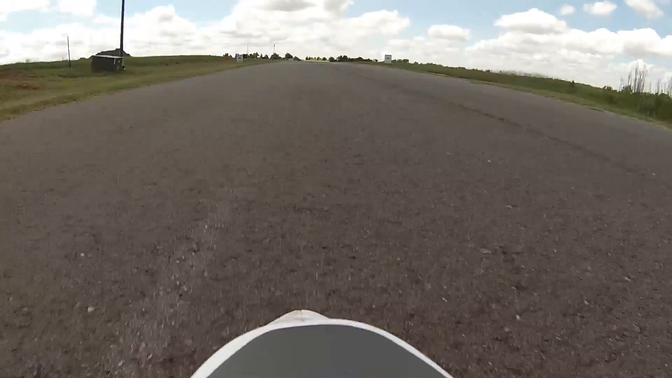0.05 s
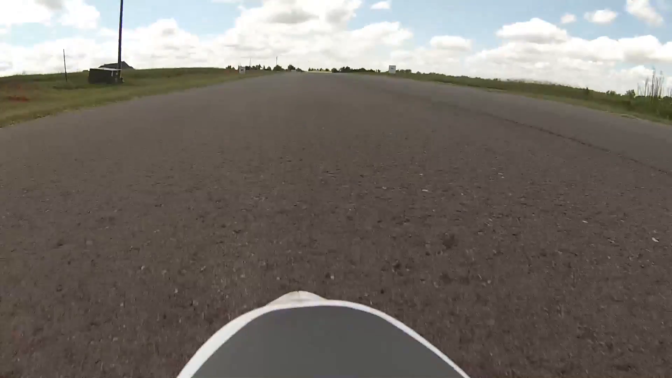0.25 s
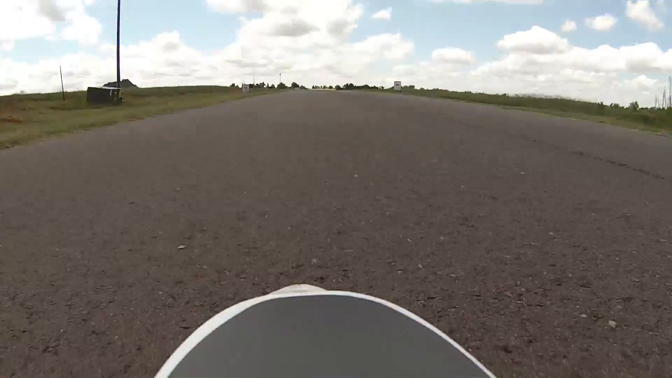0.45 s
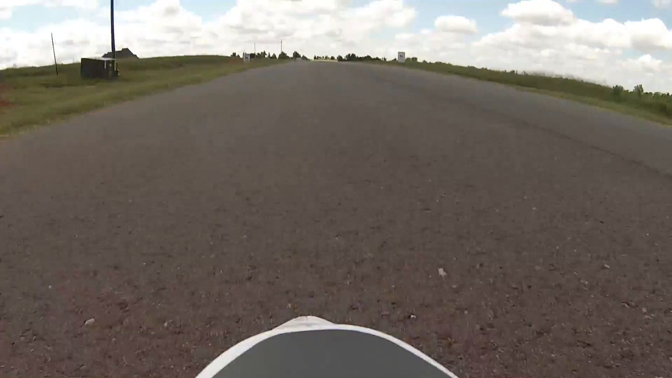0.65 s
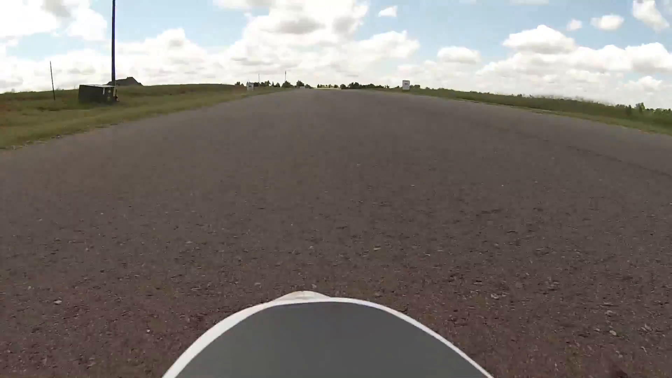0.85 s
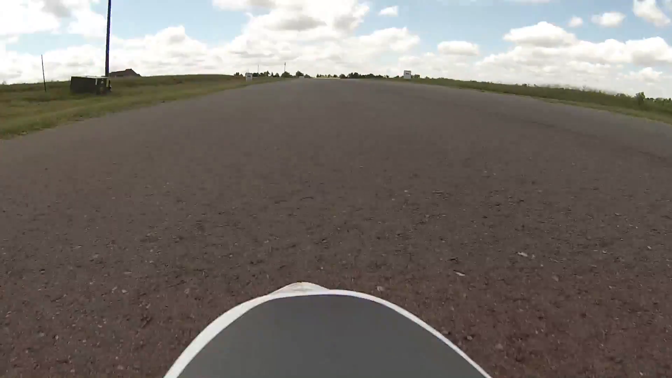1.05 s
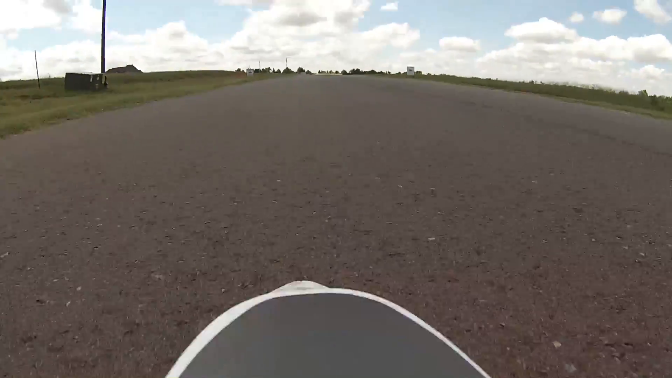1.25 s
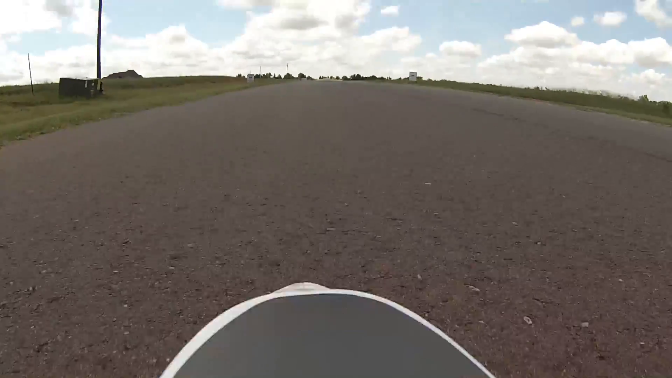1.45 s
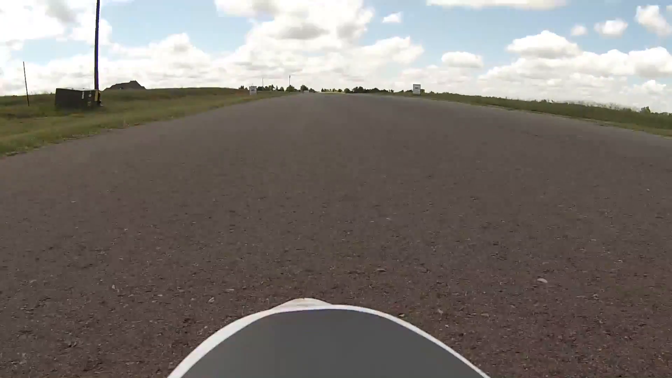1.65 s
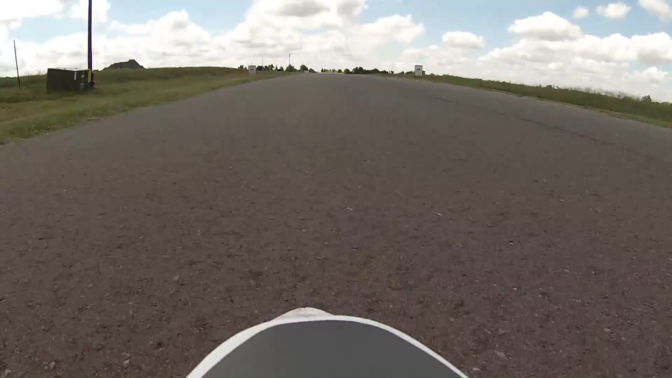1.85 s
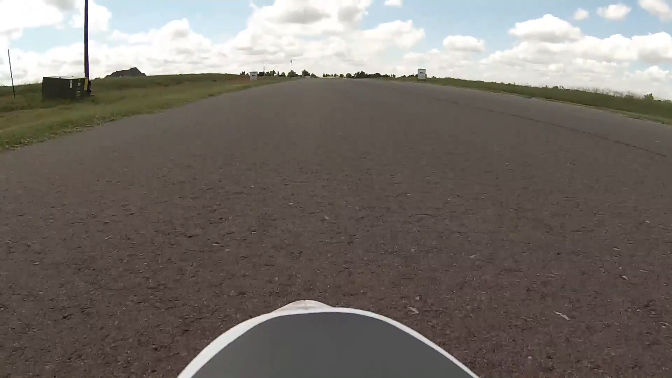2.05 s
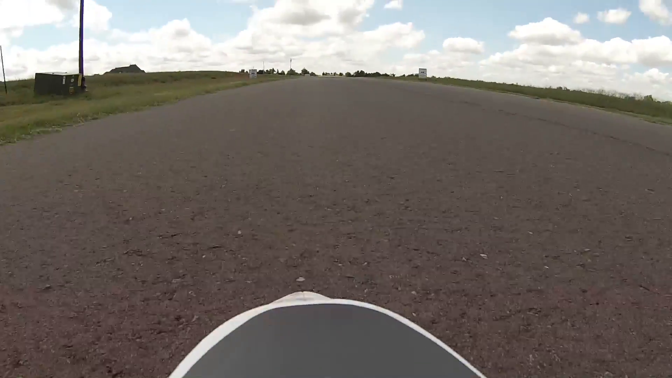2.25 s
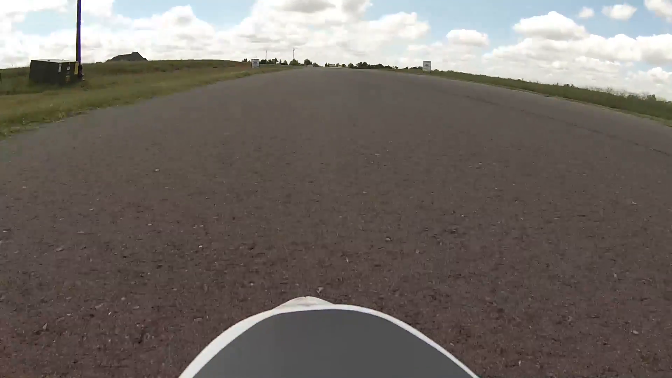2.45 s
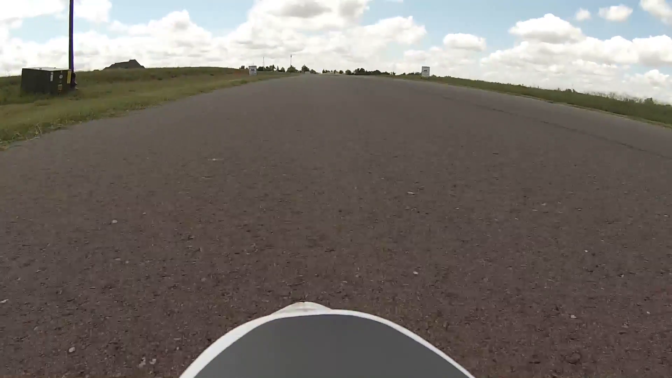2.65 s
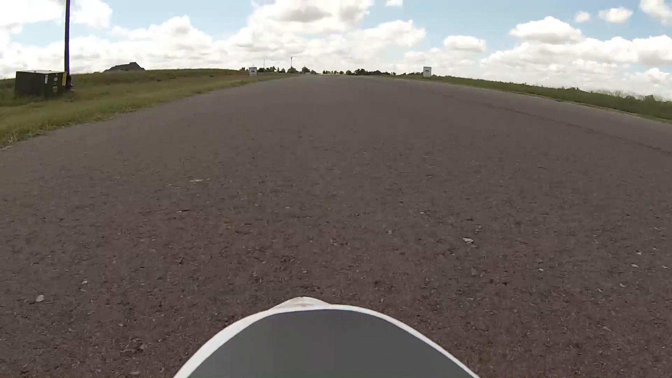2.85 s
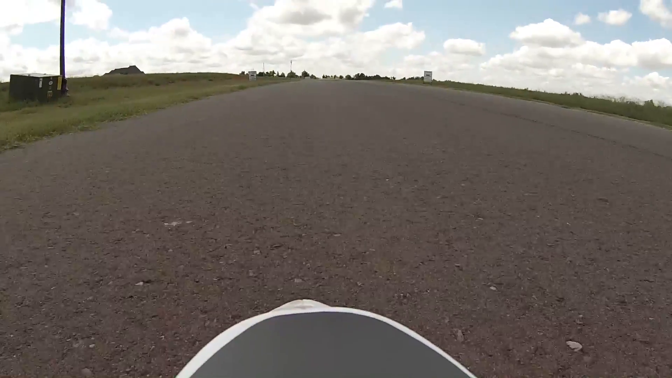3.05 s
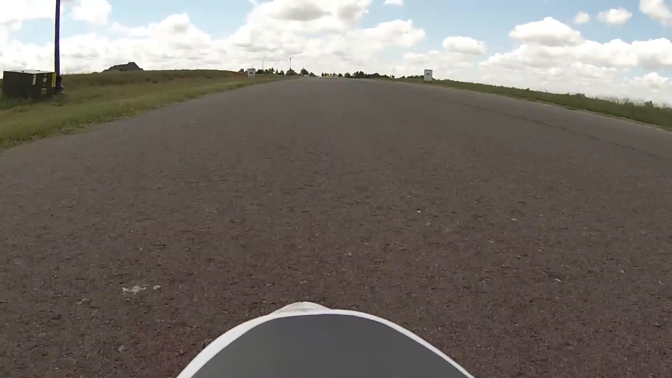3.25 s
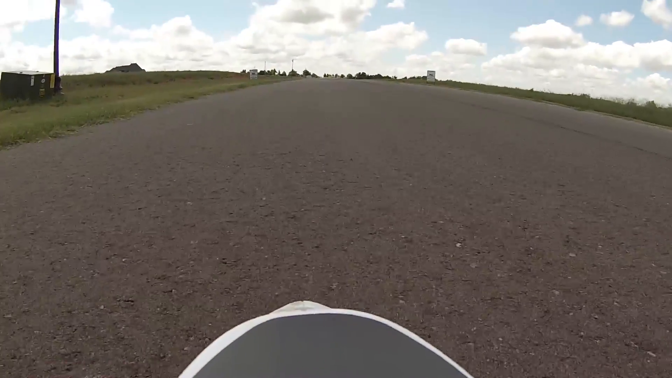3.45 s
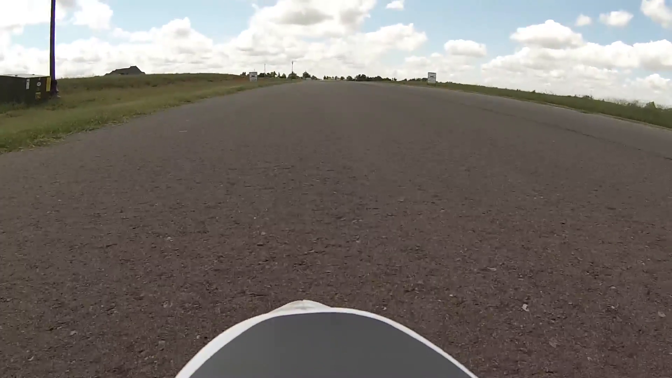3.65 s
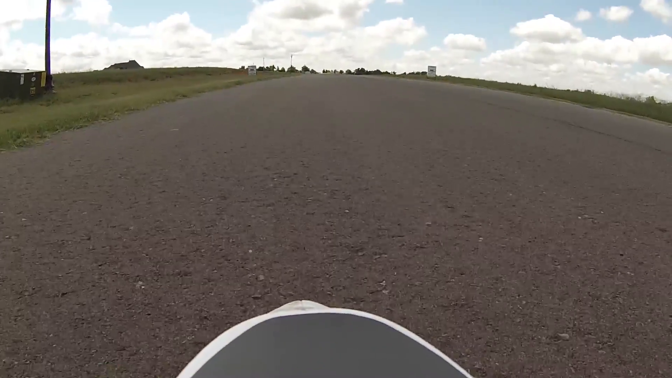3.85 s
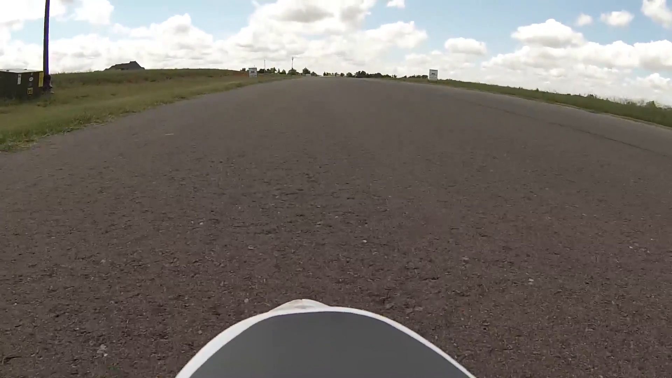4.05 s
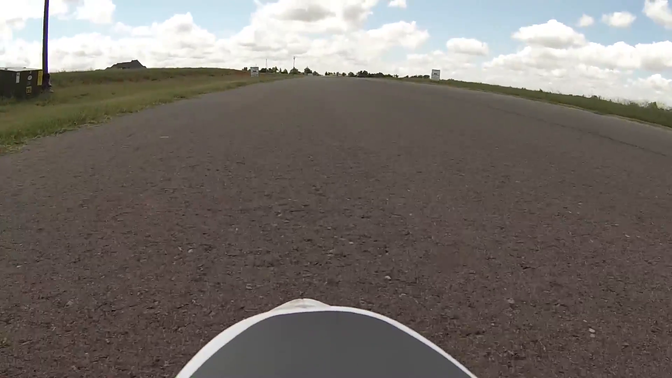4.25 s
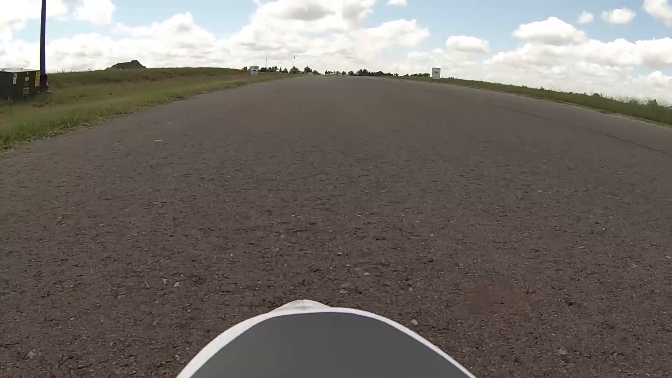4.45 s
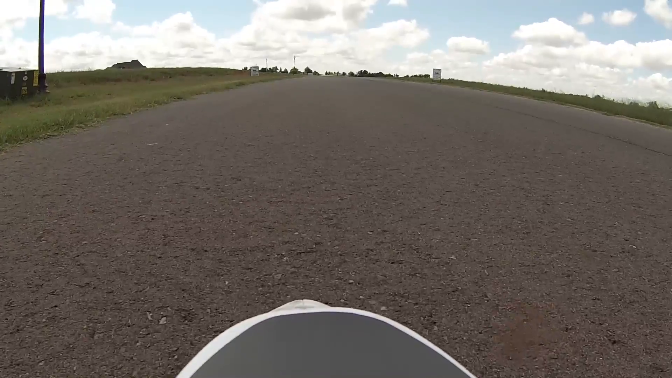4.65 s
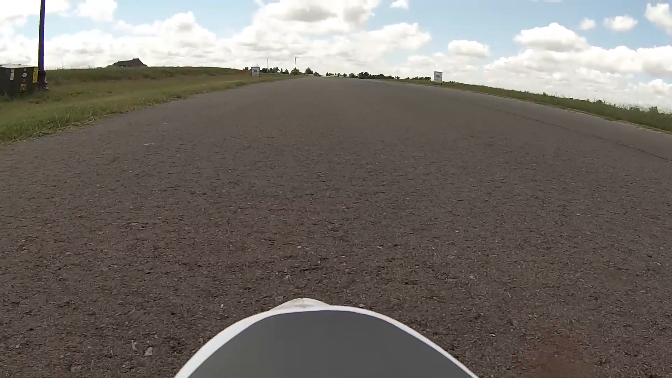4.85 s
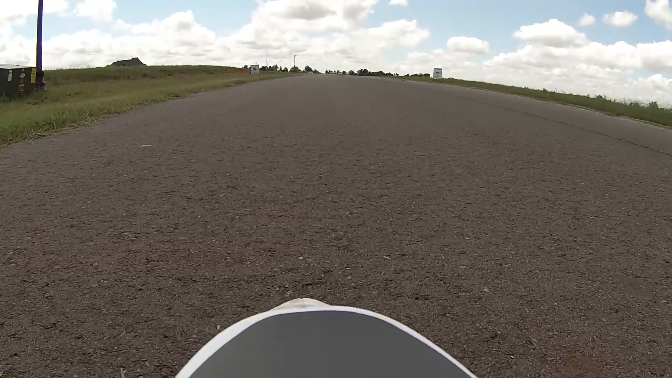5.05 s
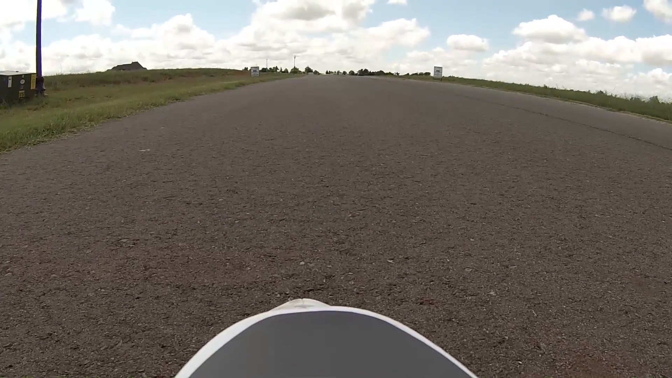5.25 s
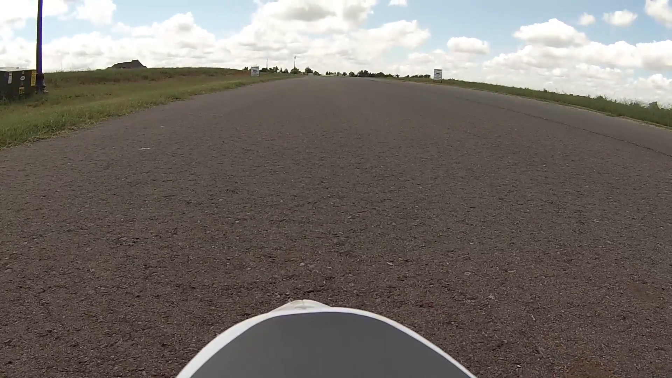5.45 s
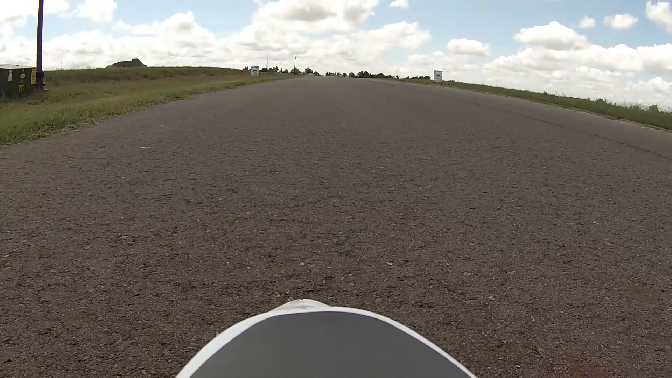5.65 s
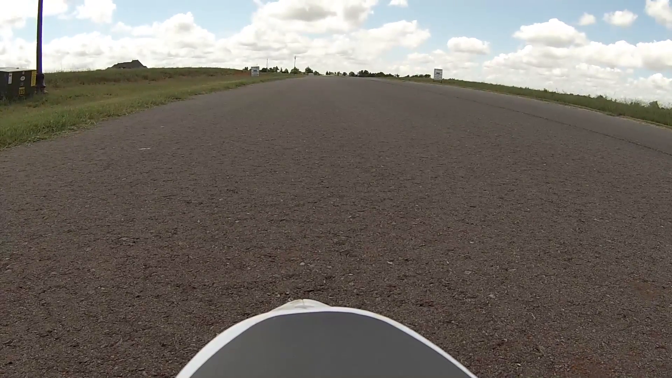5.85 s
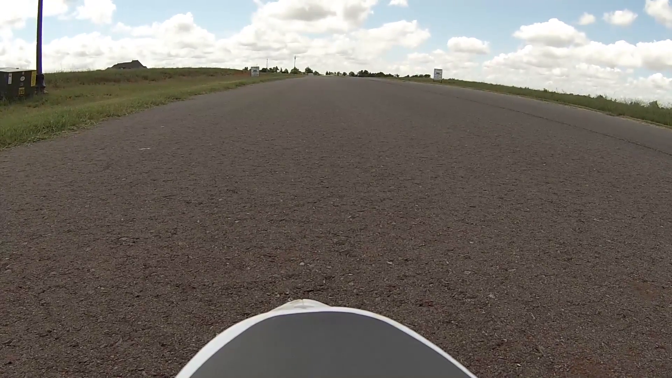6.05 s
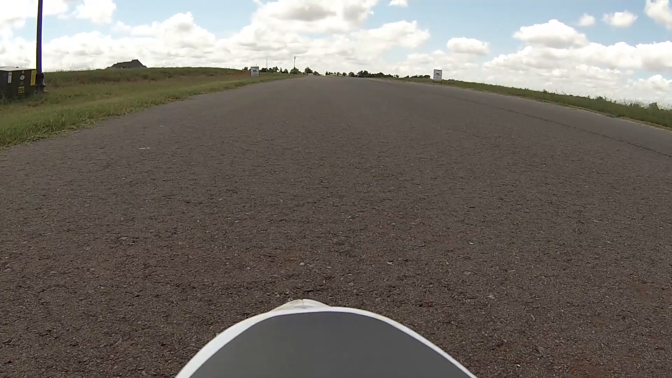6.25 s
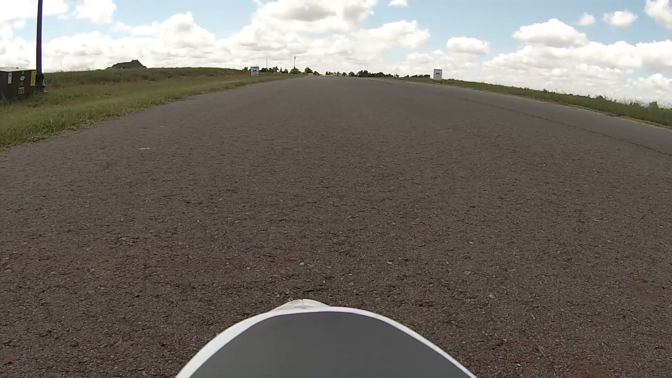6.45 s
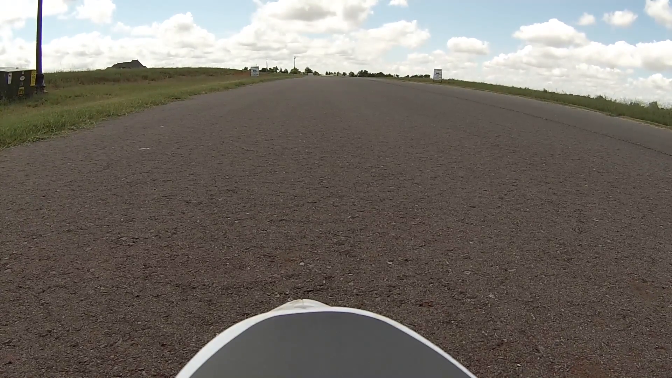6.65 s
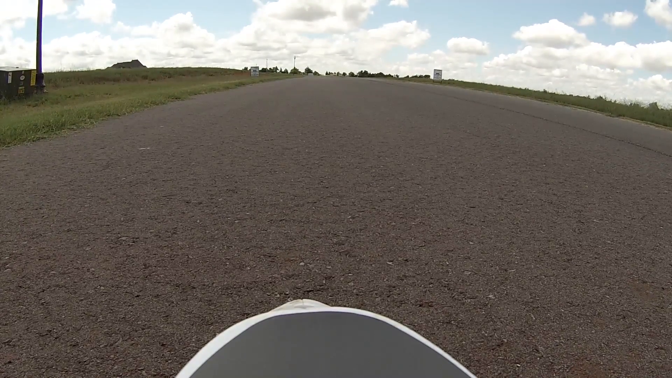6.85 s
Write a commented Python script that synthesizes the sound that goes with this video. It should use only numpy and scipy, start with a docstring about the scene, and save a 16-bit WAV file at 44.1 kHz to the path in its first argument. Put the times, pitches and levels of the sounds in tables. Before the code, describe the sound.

Close, dry microphone on a hollow model airframe. Small wheels clatter fast over coarse asphalt, drumming the shell, with sharp hollow knocks, loose metal ticking, dull thuds and cracking grit. The roll steadily slows and softens, with short gritty scrubs, until it stops. In the near quiet, a servo chatters in tiny fast buzzes and rasps twice around five and a half seconds, above a soft low hum and faint open-field breeze.

```python
"""The wheels of a model aeroplane roll out over rough asphalt in an open field, slowing steadily to a stop.
The microphone rides on the fuselage: noise shaped by resonances drums the hollow airframe and crunches grit.
While the wheels are fast, the gear clacks and loose metal ticks about once a turn, as blows that ring damped modes.
As it comes to a stop, pulses twitch a servo 50 times a second; it runs twice, a rasp of teeth in its linkage.
Beneath lie a faint, wavering low hum of two sines and the filtered noise of a light breeze."""
import sys
import numpy as np
from scipy import signal
from scipy.fft import rfft, irfft, next_fast_len
from scipy.io import wavfile
from scipy.ndimage import map_coordinates

SR = 44100
rng = np.random.default_rng(int(sys.argv[2]) if len(sys.argv) > 2 else 0)


def int16_out(signal):
    """Quantize to a 16-bit WAV file."""
    q = np.round(np.clip(np.atleast_2d(signal).T, -1, 1) * 32767)
    wavfile.write(sys.argv[1], SR, q.astype(np.int16))


N = 304731

# Listed levels are nominal: the functions add trims and random changes. Spectra are relative.

# levels of the rolling noise; its bright grit hiss rises and falls:
# [t/s, airframe drumming level/dB, low rumble level/dB, grit hiss level/dB]
ROLLING_LEVELS = [(0, -30, -31.5, -54), (.1, -33, -34, -65), (.25, -36, -36, -60), (.42, -34, -37, -51),
                  (.58, -32, -35.5, -52.5), (.88, -30.5, -36.5, -53.5), (1.2, -30, -39.5, -50),
                  (1.45, -32.5, -36.5, -48.5), (1.65, -32.5, -40, -55), (1.82, -34.5, -44, -61),
                  (2.0, -36.5, -43.5, -69), (2.28, -37, -47, -53), (2.6, -39, -47, -68),
                  (2.95, -40, -49.5, -66), (3.4, -42, -49.5, -60), (3.9, -48, -51.5, -67.5),
                  (4.35, -49, -55, -68), (4.55, -56.5, -58, -83)]
# resonances of the airframe: [f/Hz, width/Hz, level/dB]
AIRFRAME_MODES = [(195, 34.5, -10), (236, 26.6, 0.5), (264.2, 39.2, -1.5), (332, 80, -9), (441, 69, -12)]
# resonances of the fuselage skin: [f/Hz, width/Hz, level/dB]
SKIN_MODES = [(514, 58, 0), (634, 99, -4), (784, 84, -1), (920, 90, 1.5), (1068, 149, 0.5),
              (1600, 1160, -13.5), (1993, 373, -8)]
# spectrum of the low rumble: [f/Hz, level/dB]
RUMBLE_SPECTRUM = [(12, -6.5), (25, 0), (60, -1), (110, -2.5), (160, -2), (230, -16), (500, -72)]
# spectrum of stones crunching under the tyres: [f/Hz, level/dB]
CRUNCH_SPECTRUM = [(150, -28.5), (350, 1.5), (520, 2.5), (680, 4.5), (850, 2), (1060, 1.5), (1270, -4.5),
                   (1900, -1), (2300, -5.5), (2900, -15.5), (4000, -12.5), (8000, -77)]
# spectrum of fine grit, chips and pebbles: [f/Hz, level/dB]
GRIT_SPECTRUM = [(1500, -24), (2800, -5), (4300, -2), (5250, 1), (6000, -2), (7200, 1), (8500, -7),
                 (11000, -14), (15000, -19)]
# the wheels slow evenly from this rate until they stand
TURNS_PER_S, STOP_S = 19.43, 5.013
# the tyre's pressure varies once a turn, and is first lightest after this part of a turn
OUT_OF_ROUND_DB, FIRST_TURN = -0.3, .14
# crunch level at LOUD_DB of listed drumming, and the dB it follows per dB
LOUD_DB, CRUNCH_DB, CRUNCH_FOLLOWS = -31, -37, 1.04

# breeze over the open field: [f/Hz, level/dB]
AIR_SPECTRUM = [(22, -4.5), (60, 4), (100, -3.5), (160, -6), (260, -12), (420, -16), (560, -16.5),
                (750, -19), (1150, -18), (2400, -25), (4000, -29), (8000, -37), (11000, -41.5),
                (15000, -44.5)]

# the servo hunts for its position, one pulse on each control frame: [start t/s, end t/s, level/dB]
SERVO_HUNTS = [(4.35, 4.49, -55), (4.51, 4.59, -57), (4.59, 4.73, -54.5), (4.79, 5.11, -54.5),
               (5.13, 5.19, -57.5), (5.23, 5.35, -55.5), (5.37, 5.39, -55), (5.41, 5.55, -56.5),
               (5.77, 5.79, -52), (5.95, 5.99, -57.5), (6.01, 6.09, -54.5), (6.11, 6.13, -58),
               (6.15, 6.17, -55.5), (6.19, 6.33, -56.5), (6.39, 6.41, -59.5), (6.49, 6.57, -56),
               (6.59, 6.67, -55.5), (6.69, 6.71, -54), (6.73, 6.75, -56), (6.83, 6.87, -56.5)]
# the gears' contacts within one twitch: [t/s after the drive pulse, level/dB]
TWITCH_KICKS = [(-.0006, -4), (.001, 3), (.0024, -.5), (.0052, -2.5), (.0068, 0), (.012, -11)]
# spectrum of a servo kick: [f/Hz, level/dB]
SERVO_SPECTRUM = [(150, -14.5), (450, -1), (580, 1.5), (850, -3), (1150, 6.5), (1400, 5.5), (1900, 0.5),
                  (2400, 0.5), (2800, -4.5), (3200, -4), (3900, -19.5), (7000, -20), (15000, -46.5)]
FRAMES_PER_S, FIRST_FRAME_S = 50.04, .002
STEERING_DB, STEERING_SHARE = -55, 0.74  # before the hunting, the servo corrects on this share of its frames
TWITCH_SCATTER_DB = 1.7

# the gear clacks about once a turn, and on stones:
# [t/s, snap level/dB, hollow knock level/dB, rebound level/dB]
GEAR_CLACKS = [(0.0095, -34, -15, -19), (0.0583, -46, -21, -50.5), (0.1128, -24, -13.5, -24),
               (0.1638, -19, -26.5, -24), (0.2208, -21, -22, -48), (0.2742, -21.5, -21, -43),
               (0.3242, -18, -22, -26.5), (0.3779, -19.5, -28, -28), (0.4344, -22.5, -20.5, -33),
               (0.4944, -18, -20, -45), (0.5489, -44.5, -31, -45), (0.6071, -24, -28.5, -52),
               (0.6675, -28, -41, -46), (0.7283, -26, -32, -54), (0.7884, -23.5, -24, -44),
               (0.8506, -27, -24, -40), (0.916, -22.5, -22.5, -31), (0.9768, -20, -23, -33),
               (1.0429, -30, -37, -35), (1.1112, -24, -32, -57), (1.1765, -28.5, -26, -30.5),
               (1.2436, -22, -28.5, -42), (1.3154, -27, -29, -50), (1.3839, -19, -25, -48),
               (1.428, -43, -28, -49), (1.4526, -25, -23, -30.5), (1.4795, -28.5, -23.5, -40),
               (1.5252, -18, -25.5, -43), (1.5532, -30.5, -20.5, -49), (1.5983, -18.5, -21, -27.5),
               (1.6259, -36.5, -27.5, -50), (1.6755, -25, -28.5, -32.5), (1.754, -31, -30, -37),
               (2.0125, -45, -35, -55), (2.9479, -49, -34, -46), (3.086, -51, -33, -62),
               (3.6546, -48, -41.5, -60), (3.974, -49.5, -43, -60), (4.298, -72, -44.5, -75)]
# spectrum of the bright snap: [f/Hz, level/dB]
SNAP_SPECTRUM = [(500, -72.5), (2500, -6), (3800, -4.5), (5250, 3), (5900, 0), (6700, 7.5), (7900, -4),
                 (9500, -6.5), (11500, -19.5), (15000, -29.5)]
# spectrum of the scuff and the hollow knock: [f/Hz, level/dB]
KNOCK_SPECTRUM = [(80, -9), (250, -0.5), (600, 3), (1000, -5.5), (1250, 2), (1600, 6), (2100, -4.5),
                  (2800, -14), (4000, -13), (9000, -51.5)]
# body of a knock: [f/Hz, level/dB]
THUMP_SPECTRUM = [(90, -16), (220, 0), (330, -6), (450, -2.5), (650, -5.5), (900, -5), (1100, 1.5),
                  (2200, -35.5)]
# ring of the fuselage after a knock: [f/Hz, level/dB, t60/s]
HULL_MODES = [(446, -8, 0.039), (812, 3, 0.022), (982, 9, 0.023), (1470, 5, 0.018), (1602, -1, 0.0218),
              (2147, 1, 0.014), (3165, -12, 0.032), (3680, -3.5, 0.018)]
REBOUND_S, REBOUND_KNOCK_DB = .0048, -7  # one fall back; the fuselage's answer against that snap
SHIFT_DB = 0.42  # pitch scatter between contacts, as 20 log of the frequency ratio

# dips in the surface make the gear thud: [t/s, level/dB]
SURFACE_DIPS = [(0.03, -21), (0.642, -21.5), (1.132, -17.5), (1.342, -19), (1.628, -18.5), (2.52, -27.5),
                (2.679, -31), (2.964, -32), (3.957, -37)]
# spectrum of a thud: [f/Hz, level/dB]
THUD_SPECTRUM = [(20, -16), (45, 6.5), (110, -1), (200, -14), (500, -58)]

# loose metal ticks, at first about 30 ms after the clacks, on slower turns often in pairs: [t/s, level/dB]
METAL_TICKS = [(0.0399, -31), (0.092, -35), (0.14, -37), (0.1934, -36), (0.2466, -32), (0.301, -33),
               (0.3537, -32), (0.4084, -30), (0.464, -30.5), (0.521, -32.5), (0.5787, -27), (0.6348, -32),
               (0.694, -32.5), (0.755, -34.5), (0.817, -30), (0.8796, -28), (0.943, -30), (1.0064, -31.5),
               (1.072, -31.5), (1.1422, -34.5), (1.2062, -36), (1.2723, -31.5), (1.348, -31),
               (1.4155, -30.5), (1.5592, -31), (1.6305, -31.5), (1.7098, -33), (1.787, -35.5), (2.04, -34),
               (2.0524, -32.5), (2.1304, -34), (2.1452, -32.5), (2.199, -33.5), (2.2317, -30.5),
               (2.2914, -30.5), (2.3173, -32), (2.384, -31), (2.4049, -32.5), (2.4818, -32.5),
               (2.5042, -33.5), (2.8124, -33.5), (2.83, -32), (3.2495, -34.5), (3.264, -33), (3.4031, -35),
               (3.4146, -32.5), (3.974, -52)]
# ring of the loose metal: [f/Hz, level/dB, t60/s]
METAL_MODES = [(4570, -6, 0.019), (5310, 1, 0.011), (5370, 6.5, 0.0077), (7550, -3.5, 0.011),
               (8770, -1.5, 0.0081), (10360, -17.5, 0.0145), (12600, -13.5, 0.0056), (13670, -8, 0.01)]
# spectrum of metal buzzing on its seat: [f/Hz, level/dB]
BUZZ_SPECTRUM = [(500, -11.5), (1600, -5.5), (2300, -10.5), (3300, -14), (4300, -5.5), (5100, 5.5),
                 (6200, -2.5), (7400, 1.5), (8600, -3.5), (11000, -4), (13500, -3.5), (15000, -9)]
BUZZ_S = 0.00073  # one touch of the metal, from its peak to 1/e

# lumps in the asphalt swell the rolling noise: [t/s, airframe level/dB, skin level/dB]
ASPHALT_LUMPS = [(0.07, -27, -45), (0.775, -27.5, -35), (0.858, -26, -38), (0.909, -26, -31),
                 (1.042, -32, -44), (1.355, -28.5, -31.5), (1.478, -27.5, -43), (1.662, -29, -54),
                 (1.893, -32, -43), (2.016, -33.5, -43), (2.053, -42, -37.5), (2.084, -31, -46),
                 (2.231, -29, -40), (2.32, -39, -35.5), (2.397, -52, -38.5), (2.438, -42, -44),
                 (2.5, -38, -41), (2.642, -40, -45), (2.718, -36.5, -64), (2.748, -36, -42),
                 (2.869, -34.5, -39), (2.979, -45, -44), (3.005, -37, -44.5), (3.283, -37, -44),
                 (3.595, -58, -47), (3.752, -43, -53), (3.796, -48, -47.5), (4.021, -42.5, -55),
                 (4.308, -46, -55)]
BUMP_S = 0.017  # a tyre's load on a lump, from its peak to 1/e

# larger pieces of grit crack under a tyre: [t/s, level/dB]
PEBBLE_CRACKS = [(0.5385, -52), (0.6483, -42), (0.7686, -39), (0.8275, -39), (1.1283, -39), (1.147, -34),
                 (1.335, -34), (1.5093, -39), (1.949, -44.5), (2.285, -40), (2.53, -41), (2.783, -47),
                 (3.194, -47), (3.301, -45), (3.5892, -48)]

# a tyre scrubs sideways over loose grit: [start t/s, end t/s, level/dB]
TYRE_SCRUBS = [(1.94, 2.0, -48), (2.01, 2.08, -44.5), (2.2, 2.34, -45.5), (2.46, 2.55, -47),
               (2.635, 2.655, -47.5), (3.19, 3.28, -49), (3.295, 3.33, -47), (3.355, 3.385, -53),
               (3.58, 3.61, -51.5)]
# spectrum of sliding grit: [f/Hz, level/dB]
SCRUB_SPECTRUM = [(600, -12), (1200, -5), (1900, 14), (2800, 8.5), (3800, 4.5), (5250, 5), (6200, 6),
                  (7200, 3.5), (8500, -5), (11000, -15), (15000, -20)]

# course of the low hum: [t/s, level/dB]
HUM_LEVEL = [(4.5, -72), (4.6, -51), (4.7, -53), (4.78, -65), (4.83, -54), (4.88, -59), (4.93, -52.5),
             (5.03, -53), (5.15, -63), (5.29, -50.5), (5.41, -52), (5.5, -61), (5.62, -51.5), (5.8, -57),
             (6.04, -55), (6.17, -66), (6.34, -51), (6.42, -59), (6.73, -54), (6.86, -62)]
HUM_HZ = 126.3  # centre of its wavering pitch

# the servo gears running: [start t/s, end t/s, level/dB]
SERVO_RUNS = [(5.52, 5.81, -59.5), (5.569, 5.611, -50.5), (5.651, 5.69, -48), (5.69, 5.716, -52),
              (5.828, 5.923, -48.5)]
# spectrum of meshing gears: [f/Hz, level/dB]
MESH_SPECTRUM = [(150, -18), (500, 1.5), (800, -7), (1160, 1), (1400, 1), (2350, 0), (2800, -12),
                 (5200, -12.5), (8000, -24), (15000, -34)]
# resonances of the servo and its linkage: [f/Hz, width/Hz, level/dB]
LINKAGE_MODES = [(928, 38, 5), (1163, 40, 5.5), (1530, 54, -2), (2060, 150, -7), (2440, 140, -7),
                 (3430, 170, -10), (4870, 230, -16), (6700, 160, -16), (8400, 350, -21)]
# the servo's teeth skip as it reverses: [t/s, level/dB]
SERVO_SKIPS = [(5.633, -38.5), (5.652, -43.5), (5.895, -42.5), (6.039, -57), (6.299, -52.5), (6.519, -57)]
# teeth that slip past in one skip: [t/s after its start, level/dB]
SKIPPED_TEETH = [(0, -4.5), (.0015, -1.5), (.0034, -5)]
# spectrum of one slipping tooth: [f/Hz, level/dB]
TOOTH_SPECTRUM = [(400, -6.5), (1200, -3), (1800, 4), (2500, -1.5), (3200, 2), (4300, -8), (5400, -4),
                  (8000, -15), (14500, -20)]

TOP_HZ = 14700  # upper edge of the microphone's band


def amp(db):
    """Decibels to gain."""
    return 10 ** (np.asarray(db) / 20)


def unit(x):
    """Scale to rms 1."""
    return x / np.sqrt(np.mean(x ** 2) + 1e-20)


def curves(rows):
    """One value per sample for each column after the time."""
    s, *columns = np.transpose(rows)
    return [np.interp(np.arange(N) / SR, s, column) for column in columns]


def wobble(rate):
    """A smooth random curve, rate knots a second."""
    knots = rng.standard_normal(int(N * rate / SR) + 4)
    return map_coordinates(knots, [np.arange(N) * rate / SR])


def colour(x, spectrum, size=4096):
    """Pass x through a causal, minimum-phase filter with the given (Hz, dB) shape."""
    hz, db = np.transpose(spectrum)
    grid = np.fft.rfftfreq(size, 1 / SR)
    gain = amp(np.interp(np.log(grid + 1), np.log(hz), db))
    # folding the cepstrum makes the filter causal
    cepstrum = irfft(np.log(gain))
    cepstrum[1:size // 2] *= 2
    cepstrum[size // 2 + 1:] = 0
    impulse = irfft(np.exp(rfft(cepstrum)))
    return signal.fftconvolve(x, impulse)[:len(x)]


def shifted(spectrum, spread_db):
    """The (Hz, dB) shape moved up or down in pitch by a random factor."""
    factor = amp(rng.normal(0, spread_db))
    return [(hz * factor, db) for hz, db in spectrum]


def filtered(x, response):
    """Apply a complex response of frequency to x."""
    m = next_fast_len(N + SR // 2)
    return irfft(rfft(x, m) * response(np.fft.rfftfreq(m, 1 / SR)), m)[:N]


def resonate(x, modes):
    """Ring x through (Hz, width, dB) resonances of alternating sign."""
    def response(f):
        total = 0
        for k, (centre, width, db) in enumerate(modes):
            damping = 1j * f * width
            total = total + (-1) ** k * amp(db) * damping / (centre * centre - f * f + damping)
        return total
    return filtered(x, response)


def strike(modes, t):
    """Damped modes, rung at new strengths by every blow."""
    ring = 0
    for hz, db, t60 in modes:
        level_db = db + rng.normal(0, 2.53) - 60 * t / t60
        ring = ring + amp(level_db) * np.sin(2 * np.pi * hz * t)
    return ring


def contact(t60, scatter, size=1400):
    """One sharp blow followed by the dying chatter of the parts that it shakes."""
    chatter = rng.standard_normal(size) * amp(-60 * np.arange(size) / SR / t60)
    blow = scatter * chatter / np.linalg.norm(chatter)
    blow[0] -= 1
    return blow


def stones(rate, spread_db, smooth):
    """Random small impacts of uneven size, on a bed of smooth friction noise."""
    met = rng.random(N) < rate / SR
    hits = met * rng.choice([-1, 1], N) * amp(spread_db * rng.uniform(-0.99, 1, N))
    return unit(unit(hits) + smooth * rng.standard_normal(N))


def add(track, s, sound, db):
    """Mix in a short sound whose energy equals that level held for 3 ms."""
    sound = sound * np.sqrt(.003 * SR / np.sum(sound ** 2))
    part = track[max(round(s * SR), 0):][:len(sound)]
    part += amp(db) * sound[:len(part)]


def spells(rows, edge):
    """Gain that is on during each (start, end, dB) row, with edges that many seconds long."""
    t = np.arange(N) / SR
    gain = 0
    for start, end, db in rows:
        gain = gain + amp(db) * np.clip(np.minimum(t - start, end - t) / edge + .5, 0, 1)
    return gain


def wheels():
    """Rolling wheels rumble, drum the airframe, crunch stones under the tyres and hiss over grit."""
    drum_db, rumble_db, grit_db = curves(ROLLING_LEVELS)
    crunch_db = CRUNCH_DB + CRUNCH_FOLLOWS * (drum_db - LOUD_DB)
    speed = np.clip(1 - np.arange(N) / SR / STOP_S, .001, 1)  # part of the starting speed
    turns = np.cumsum(TURNS_PER_S * speed) / SR - FIRST_TURN
    press_db = OUT_OF_ROUND_DB * np.cos(2 * np.pi * turns) + 1.13 * wobble(14)
    patches = np.tanh(wobble(130))  # coarse patches load the tyres for a moment
    rate = 400 + 700 * speed  # stones met per second

    # the same unevenness, crossed faster, shakes at a higher pitch
    profile = colour(rng.standard_normal(N), RUMBLE_SPECTRUM)
    shaking = map_coordinates(profile, [np.cumsum(.6 + .9 * speed)], mode="wrap", order=1)
    rumble = amp(rumble_db + 3.0) * unit(shaking)
    drum = amp(drum_db - 2.0) * unit(resonate(stones(rate=rate, spread_db=3, smooth=0.93), AIRFRAME_MODES))

    # stones ring the skin; a broad crunch grows with speed
    skin_hits = stones(rate=rate, spread_db=7.0, smooth=0.27) * amp(2.7 * patches)
    skin = unit(resonate(skin_hits, SKIN_MODES))
    broad_hits = stones(rate=rate, spread_db=4.5, smooth=0.44) * amp(8.9 * patches)
    broad = unit(colour(broad_hits, CRUNCH_SPECTRUM))
    crunch = amp(crunch_db + press_db) * unit(skin + amp(-4.5 + 7.5 * speed) * broad)

    # fine grit hisses in clumps
    clumps = amp(11.0 * patches + 4.4 * speed * np.tanh(wobble(260)))
    hiss = unit(clumps * colour(stones(rate=4 * rate, spread_db=7.0, smooth=0.54), GRIT_SPECTRUM))

    # single chips flick against the shell, each a different burst a few milliseconds long
    flicks = np.abs(stones(rate=110 * speed, spread_db=6.0, smooth=0))
    bursts = signal.lfilter([1], [1, -np.exp(-1 / (0.00157 * SR))], flicks)
    chips = unit(colour(bursts * rng.standard_normal(N), GRIT_SPECTRUM))
    grit = amp(grit_db + press_db) * (amp(-2.5) * hiss + amp(4) * speed * chips)

    fade = np.minimum(speed / 0.068, 1)  # falls away over the last of the roll
    return fade * (rumble + drum + crunch + grit)


def air():
    """A light breeze over the open field, with a smooth hiss on top."""
    return amp(-53.5 + 0.99 * wobble(4.1)) * unit(colour(rng.standard_normal(N), AIR_SPECTRUM))


def twitches():
    """Each drive pulse kicks the servo's gears, takes up their slack and lets go."""
    out = np.zeros(N)
    for s in np.arange(FIRST_FRAME_S, N / SR, 1 / FRAMES_PER_S):
        steering = rng.random() < STEERING_SHARE and s < SERVO_HUNTS[0][0]
        levels = [STEERING_DB] if steering else [db for start, end, db in SERVO_HUNTS if start < s < end]
        change_db = rng.normal(0, TWITCH_SCATTER_DB)
        for db in levels:
            for delay, kick_db in TWITCH_KICKS:
                kick = colour(contact(t60=0.011, scatter=1.4), SERVO_SPECTRUM)
                kick_s = s + delay + rng.normal(0, .0003)
                add(out, kick_s, kick, db + change_db + kick_db + rng.normal(0, 1.9))
    return out


def clacks():
    """Play in the gear scuffs shut with a bright snap, the fuselage answers hollowly and the gear rebounds once."""
    out, t = np.zeros(N), np.arange(SR // 25) / SR
    lead = .007
    for s, snap_db, knock_db, rebound_db in GEAR_CLACKS:
        # rubbing that peaks 2 ms before the contact
        scuff = rng.standard_normal(len(t)) * np.exp(-((t - .005) / 0.0056) ** 2)
        add(out, s - lead, colour(scuff, KNOCK_SPECTRUM), knock_db - 11.5)

        snap = colour(contact(t60=0.011, scatter=0.73), shifted(SNAP_SPECTRUM, SHIFT_DB))
        add(out, s, snap, snap_db + .5)
        add(out, s, colour(contact(t60=0.011, scatter=1.44), KNOCK_SPECTRUM), knock_db + .5)
        add(out, s, colour(contact(t60=0.012, scatter=0.98), THUMP_SPECTRUM), knock_db - 5)
        add(out, s, strike(HULL_MODES, t), knock_db)

        rebound = colour(contact(t60=0.007, scatter=2.0), shifted(SNAP_SPECTRUM, SHIFT_DB))
        add(out, s + REBOUND_S, rebound, rebound_db + .5)
        add(out, s + REBOUND_S, strike(HULL_MODES, t), rebound_db + REBOUND_KNOCK_DB)
    return out


def thuds():
    """The gear bottoms softly in the dips."""
    out = np.zeros(N)
    for s, db in SURFACE_DIPS:
        add(out, s, colour(contact(t60=0.062, scatter=0.91, size=4096), THUD_SPECTRUM), db)
    return out


def ticks():
    """Loose metal buzzes briefly against its seat and rings."""
    out, t = np.zeros(N), np.arange(SR // 30) / SR
    lead = .0006
    touch = np.exp(-((t - .0013) / BUZZ_S) ** 2) + amp(-17) * np.exp(-t / .0016)  # with a weak tail
    for s, db in METAL_TICKS:
        buzz = rng.standard_normal(len(t)) * touch
        add(out, s - lead, signal.fftconvolve(strike(METAL_MODES, t), buzz), db - 5.0)
        add(out, s - lead, colour(buzz, shifted(BUZZ_SPECTRUM, SHIFT_DB)), db + 1)
    return out


def bumps():
    """Crossing a lump is a short flurry of stone hits that booms in the airframe and rattles its skin."""
    t = np.arange(N) / SR
    boom, rattle = np.zeros(N), np.zeros(N)
    for s, airframe_db, skin_db in ASPHALT_LUMPS:
        near = np.abs(t - s) < .06
        load = np.exp(-((t[near] - s + 0.0034) / BUMP_S) ** 2)
        boom[near] += amp(airframe_db) * load
        rattle[near] += amp(skin_db) * load
    airframe = unit(resonate(stones(rate=900, spread_db=2, smooth=0.66), AIRFRAME_MODES))
    skin = unit(resonate(stones(rate=500, spread_db=7, smooth=0.36), SKIN_MODES))
    return amp(-1.5) * boom * airframe + amp(-0.7) * rattle * skin


def pebbles():
    """Each piece of grit gives one dry crack."""
    out = np.zeros(N)
    for s, db in PEBBLE_CRACKS:
        add(out, s, colour(contact(t60=0.0072, scatter=4.5), shifted(GRIT_SPECTRUM, SHIFT_DB)), db)
    return out


def scrubs(slip_hz=95, grip_db=10):
    """A sliding tyre sticks and slips about a hundred times a second; each slip is a puff of grit."""
    phase = 2 * np.pi * np.cumsum(slip_hz * amp(2.1 * wobble(60))) / SR
    slips = amp(grip_db * np.cos(phase) + 6.6 * np.tanh(wobble(90)))
    grains = colour(stones(rate=1800, spread_db=8.5, smooth=0.37), SCRUB_SPECTRUM)
    return spells(TYRE_SCRUBS, edge=0.013) * unit(slips * grains)


def hum():
    """A faint, wavering low hum with a weak octave."""
    db, = curves(HUM_LEVEL)
    phase = 2 * np.pi * np.cumsum(HUM_HZ + 1.72 * wobble(5.7)) / SR
    waver = amp(1.2 * wobble(8))
    tone = np.sin(phase) + amp(-19.0) * np.sin(2 * phase)
    return np.sqrt(2) * amp(db - 1.0) * waver * tone


def gears():
    """Longer servo moves are a rasp of teeth that rings the linkage, with a few sharp skips."""
    skips = np.zeros(N)
    for s, db in SERVO_SKIPS:
        for delay, tooth_db in SKIPPED_TEETH:
            tooth = colour(contact(t60=0.011, scatter=1.1), TOOTH_SPECTRUM)
            add(skips, s + delay + rng.normal(0, .0002), tooth, db + tooth_db)
    rasp = stones(rate=2000, spread_db=1, smooth=0.36) * amp(4.0 * np.tanh(wobble(160)))
    mesh = unit(colour(rasp, MESH_SPECTRUM))
    ring = unit(resonate(stones(rate=1200, spread_db=5, smooth=0.26), LINKAGE_MODES))
    return skips + spells(SERVO_RUNS, edge=0.014) * unit(mesh + amp(-1.5) * ring)


def scene():
    """All sources summed at one microphone on the fuselage, in open air with no echo."""
    rolling = wheels() + clacks() + thuds() + ticks() + bumps() + pebbles() + scrubs()
    servo = twitches() + gears()
    return (rolling + servo + hum() + air())[None]


def record(dry):
    """The microphone's band ends in a very steep low-pass."""
    return np.array([filtered(x, lambda hz: 1 / np.sqrt(1 + (hz / TOP_HZ) ** 90)) for x in dry])


dry = scene()
out = record(dry)
int16_out(out)
```